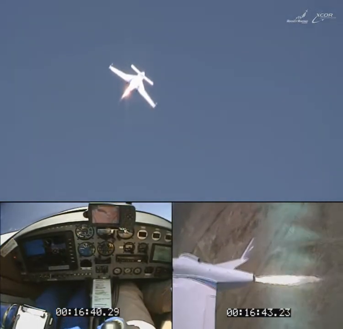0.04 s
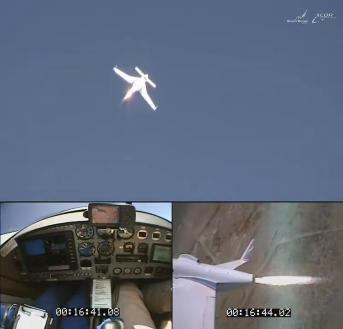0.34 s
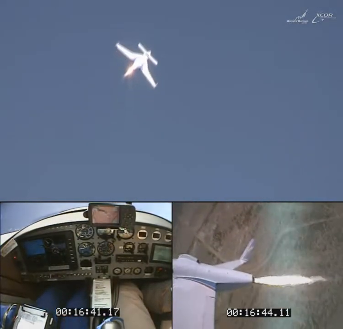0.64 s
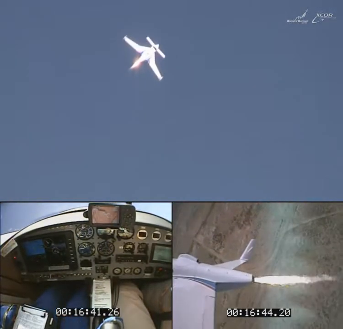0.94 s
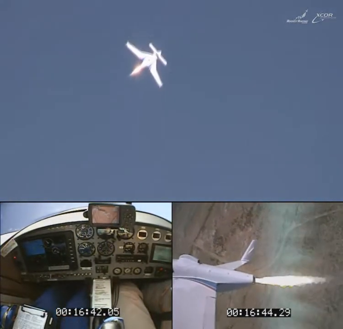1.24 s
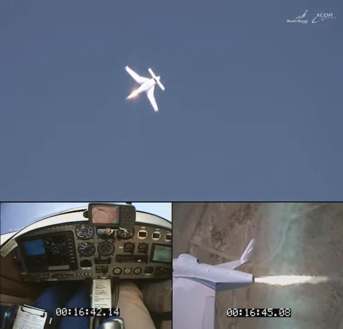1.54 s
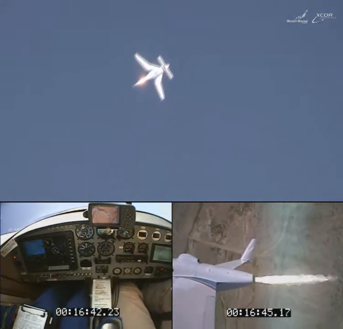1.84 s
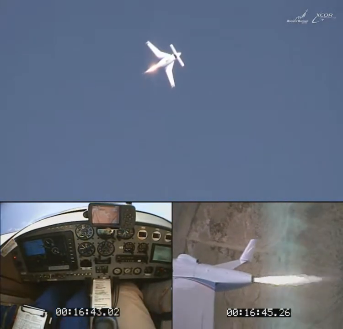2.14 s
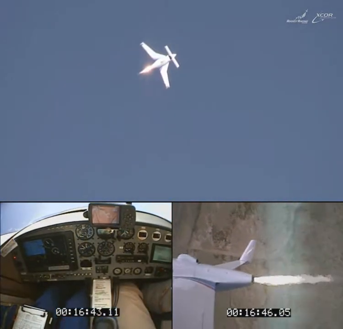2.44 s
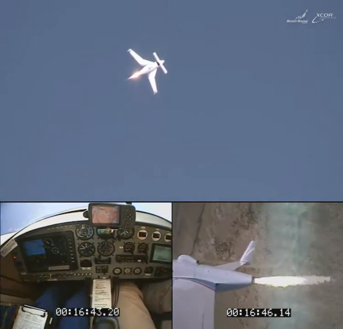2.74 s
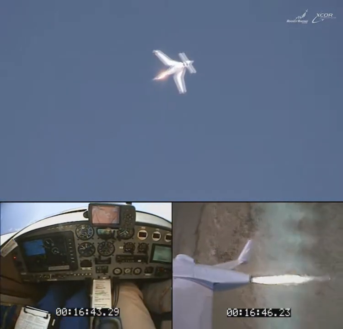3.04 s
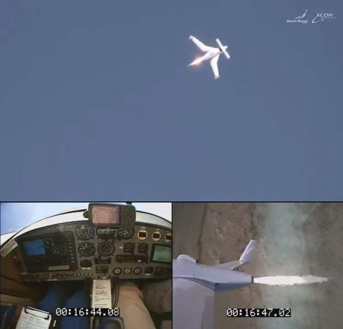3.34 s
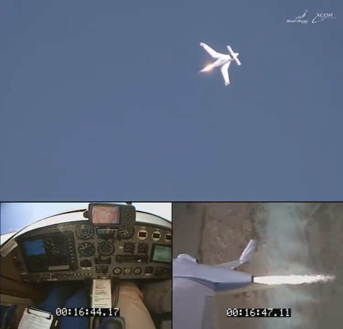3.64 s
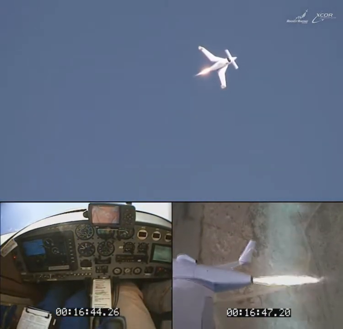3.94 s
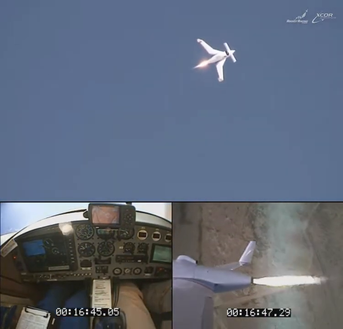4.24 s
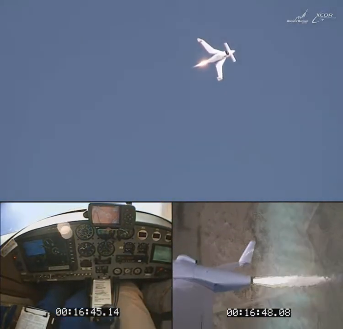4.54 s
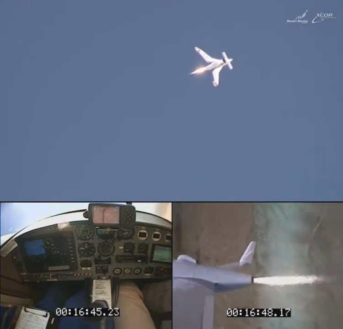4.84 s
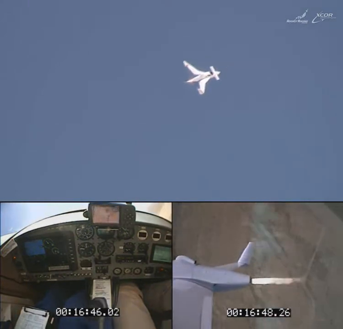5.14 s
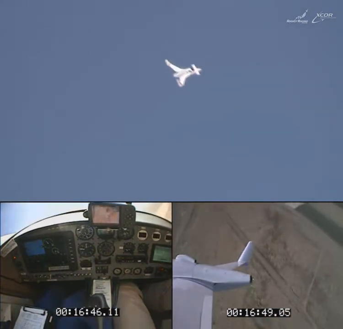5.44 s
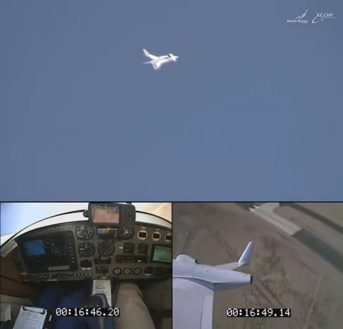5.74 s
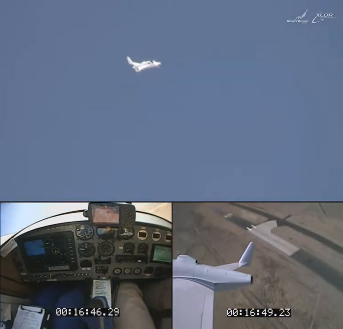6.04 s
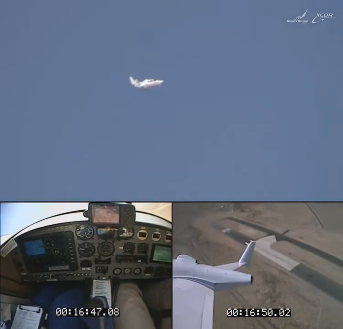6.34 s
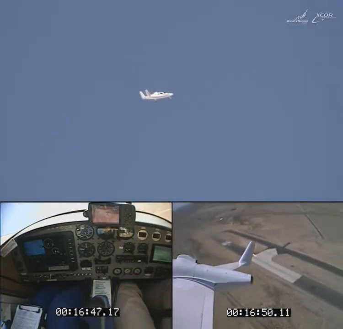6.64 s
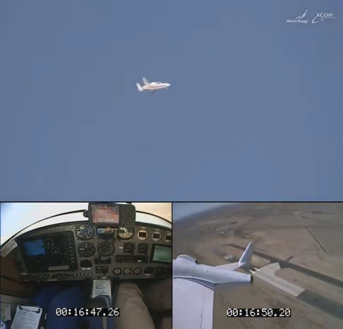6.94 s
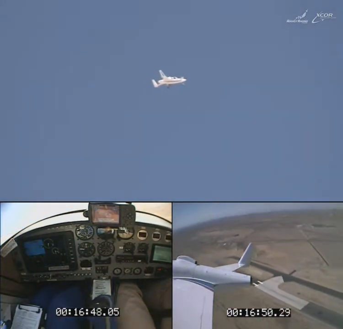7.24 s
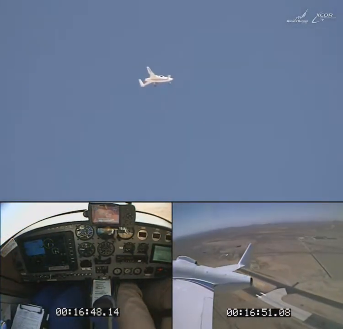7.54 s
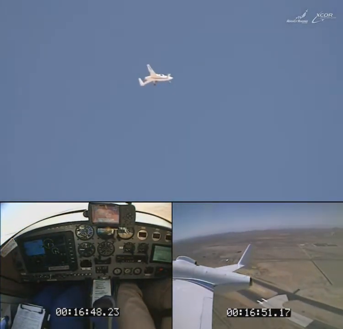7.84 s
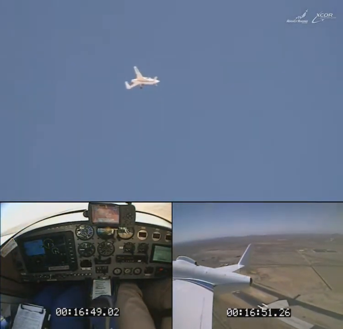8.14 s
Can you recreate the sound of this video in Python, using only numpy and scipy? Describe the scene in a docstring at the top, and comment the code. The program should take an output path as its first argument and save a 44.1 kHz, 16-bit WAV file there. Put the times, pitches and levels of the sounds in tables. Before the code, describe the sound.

Close inside a flying aircraft, a rocket flame rumbles and roars with a fluttering, low-to-mid howl and light rattles, blended with crackling exhaust picked up from far below in the open air. Past halfway the flame dies with two low thumps and a snap. The far roar lingers, swelling and swirling in the wind, before dropping away near the end and leaving a thin slipstream hiss.

```python
"""In a rocket plane's cockpit and on the ground below, heard at once: the engine burns and shuts down.
On board the flame rumbles, roars and coughs, an oscillating flow howls near 330 Hz and fittings tick;
after flame-out the slipstream is left. On the ground the roar and howl arrive late, steepened into
crackle and combed by the ground echo, so they go on for two and a half seconds after the flame is out."""
import sys
import numpy as np
from scipy import signal
from scipy.fft import rfft, irfft
from scipy.io import wavfile
from scipy.ndimage import uniform_filter1d

SR = 44100
rng = np.random.default_rng(int(sys.argv[2]) if len(sys.argv) > 2 else 0)


def inscribe(sig):
    """Save sig as 16-bit PCM at rate SR to the path in sys.argv[1].

    A 1-D sig is mono; a 2-D sig holds one channel per row.
    Samples are clipped to [-1, 1] before scaling.
    """
    pcm = np.round(np.clip(np.atleast_2d(sig).T, -1, 1) * 32767)
    wavfile.write(sys.argv[1], SR, pcm.astype(np.int16))


N = 370440
TIME = np.arange(N) / SR
FLAME_OUT_S, TRAVEL_S, PASS_S = 4.982, 2.455, 3.07  # shutdown, delay to the ground, fly-over
ROAR_SAG_DB_PER_S, ROAR_FADE_DB_PER_S = 0.97, 30
FLUTTER_DB = .6

# the howl sags, then swoops up as the flow collapses: t/s, f/Hz, level/dB before the burn envelope
HOWL = [(0, 333.1, -18), (2.5, 330.2, -19.5), (2.85, 324.4, -19), (3.07, 336.6, -21.5), (3.2, 322, -19),
        (3.33, 323.4, -16), (3.5, 318, -16.5), (3.72, 333.6, -21.5), (3.82, 325.5, -17), (3.91, 321.9, -25),
        (3.98, 326, -16.5), (4.25, 327.7, -18), (4.39, 326.6, -25.5), (4.49, 327.5, -11.5),
        (4.55, 334, -25), (4.61, 337.3, -20.5), (4.76, 331.8, -19.5), (4.9, 338.4, -21), (5.02, 329, -18.5),
        (5.048, 283, -12.5), (5.105, 251.4, -27), (5.135, 346.8, -19), (5.2, 367, -20), (5.28, 398, -35),
        (5.38, 449, -57)]
# coughs of the flame, the last two as it dies: t/s, level/dB, half length/s, f/Hz
COUGHS = [(0.105, -19, 0.03, 88), (4.08, -19, 0.025, 76), (5.02, -15.5, 0.036, 90),
          (5.15, -13.5, 0.014, 72)]
# tone colours of the engine on board: f/Hz, relative level/dB
RUMBLE_COLOUR = [(10, -22), (25, -6.5), (38, -6.5), (65, -2), (84, -3.5), (102, -6.5), (130, -8.5),
                 (180, -15), (250, -23.5), (400, -49), (900, -91.5)]
ROAR_COLOUR = [(120, -31.5), (240, -18), (310, 8), (355, -2.5), (385, 2.5), (480, -2.5), (580, 0), (635, 9),
               (690, -2), (820, -11.5), (1020, -9), (1300, -27.5), (2100, -18.5), (2900, -32), (6000, -75)]
SNAP_COLOUR = [(1200, -24), (2050, -9), (2350, 5), (2600, -4), (3000, -8), (6000, -42)]

# fader ride of the howl on the ground: t/s, gain/dB
FAR_HOWL = [(5.25, -28), (5.43, -20.5), (5.6, -26.5), (5.7, -23), (5.78, -31), (5.88, -22), (6.12, -21),
            (6.31, -28), (6.38, -21), (6.46, -28), (6.75, -25.5), (6.84, -33), (6.96, -19.5), (7.07, -24.5),
            (7.32, -24.5), (7.42, -31.5), (7.5, -26), (7.58, -26), (7.74, -38.5), (7.85, -60)]
# Doppler shift, a little flat until the plane turns: t/s, shift/Hz
DOPPLER = [(5.4, -13), (6.4, -6), (7, 3)]
# bursts of strong shocks on the ground: t/s, boost/dB
SHOCKS = [(4.28, 4), (5.632, 1.5), (6.11, 1.3), (6.499, 5.3), (6.685, 1.5), (6.718, 3), (6.755, 3.5),
          (7.08, 2), (7.503, 3), (7.53, 1.5), (7.582, 2.8)]
# restless air swells the distant roar's treble and its body: t/s, gain/dB
TREBLE_SWELLS = [(0, 2.5), (.15, 2.5), (.3, -9), (.55, 3), (.75, -3), (.95, 1), (1.2, -1), (1.45, -5.5),
                 (1.56, -2), (1.68, -3.5), (1.97, 1), (2.15, -8), (2.35, 2.5), (2.75, -1), (3.08, -4.5),
                 (3.24, 6.5), (3.5, -0.5), (4.15, -2), (4.28, 0), (4.45, -4), (4.76, 5.5), (4.92, -9.5),
                 (5.28, 0.5), (5.44, 4), (5.54, -8), (5.69, 4), (5.77, -16), (5.86, -0.5), (6.11, 1),
                 (6.24, -3.5), (6.49, 3), (6.53, 1), (6.69, 8.5), (6.8, -5), (6.9, -1), (7.05, -5.5),
                 (7.2, 1.5), (7.37, -5), (7.45, 2), (7.5, 12), (7.59, 6), (7.65, -4), (7.85, 9)]
BODY_SWELLS = [(5, 0.5), (5.25, -0.5), (5.5, 2), (5.62, 4), (5.72, 0), (5.78, -2), (6, -4.5), (6.13, 2),
               (6.35, -2), (6.65, 3), (6.8, 1.5), (6.91, 5), (6.99, -4.5), (7.15, 3.5), (7.32, 2),
               (7.4, -2), (7.52, 4.5), (7.62, 6.5)]
# whistling flares in the distant roar: t/s, f/Hz, boost/dB, half length/s, glide/(Hz/s)
FLARES = [(.11, 1650, 6, .04, 0), (.17, 1520, 14, .04, 0), (0.945, 1620, 16, .045, 0),
          (.99, 2200, 4, .05, 0), (1.93, 1230, 13, .035, 0), (1.97, 1730, 8, .09, 600),
          (2.36, 1530, 3, .07, 0), (2.38, 1944, 3, .1, -300), (2.65, 1010, 3, .2, -200),
          (2.78, 1480, 6.5, .12, -400), (3.27, 1880, 5, .05, 0), (3.38, 1340, 2, .1, 900),
          (3.67, 890, 6.5, .06, 700), (3.64, 1750, 6, .07, 0), (3.9, 1290, 7, .05, 0),
          (3.96, 1700, 6, .05, 0), (4.24, 1300, 4.5, .06, 900), (4.985, 1240, 14, .04, -1200),
          (5.62, 900, 3, .08, 0), (6.43, 2250, 6, .09, 5000), (6.66, 1180, 3.5, .07, 0),
          (6.97, 1600, 9, .04, 0), (7.26, 730, 2, .09, 0), (7.54, 1110, 9, .06, -800)]
# the ground echo lags more as the plane stands higher, and comes and goes in the wind: t/s, lag/s, gain/dB
ECHO = [(.6, .00182, -2), (1.6, .00187, 1), (2.0, .0018, 0), (2.3, .00202, 3), (2.85, .00209, 3),
        (3.2, .0022, -1), (3.7, .0023, 3), (4.35, .00235, 3), (4.75, .00242, -3), (6.1, .00253, -2),
        (6.8, .0027, 0), (7.2, .00289, 1.5)]
# EQ of the long air path and of the bounce off the ground: f/Hz, gain/dB
AIR_EQ = [(400, -2), (1200, 0), (2200, 2), (3000, -5.5), (4500, -32.5), (9000, -45.5)]
GROUND_EQ = [(200, -2.5), (900, -5), (1500, -9), (2500, -14)]
# tone colours of the exhaust from the ground: f/Hz, relative level/dB
BODY_COLOUR = [(60, -31.5), (170, -10.5), (280, 3), (430, 1), (560, -3.5), (710, 2.5), (860, -3),
               (1030, -3), (1350, -8), (1900, -23.5), (2800, -35), (6000, -86)]
CRACKLE_COLOUR = [(500, -35), (1100, -10.5), (1600, -1), (2200, -5), (2700, -19.5), (3400, -27),
                  (4500, -42.5), (8000, -63)]
CRACK_COLOUR = [(250, -10), (600, 12), (2300, -4), (3200, -14), (4200, -25.5), (8000, -54)]

# clear ticks in the cockpit: t/s, level/dB of the first snap, length/s
TICKS = [(0.139, -44, .002), (0.7512, -34.5, .007), (0.8674, -44, .002), (1.257, -47, .002),
         (1.9754, -43, .002), (2.1515, -47, .002), (2.2628, -46, .002), (2.3291, -47, .002),
         (2.4503, -45, .002), (2.612, -45, .003), (2.7337, -44, .004), (2.8459, -44, .018),
         (3.3124, -43.5, .015), (3.3847, -45, .006), (3.524, -47, .003), (3.752, -46, .003),
         (3.8262, -47, .008), (3.9659, -45.5, .012), (3.984, -47, .004), (4.1654, -47.5, .004),
         (4.6194, -49, .003), (4.7626, -47, .012), (4.801, -50, .003), (4.8489, -51, .003),
         (5.1432, -44, .014), (6.7186, -50, .004)]
# hiss of gas and air along the hull: t/s, level/dB in the 4-7 kHz band
HISS = [(0, -54.5), (2.15, -55.5), (2.6, -57.5), (3.25, -55), (5.1, -60.5), (5.8, -63), (8.35, -66)]
# tone colours of the ticks and the slipstream bed: f/Hz, relative level/dB
TICK_COLOUR = [(2000, -13.5), (4500, 0), (5800, -1), (7000, -5), (8600, -7.5), (11000, -11), (15000, -21)]
HISS_COLOUR = [(1500, -16), (2900, -5.5), (3350, 10.5), (3900, 0), (4500, 0), (5100, 1.5), (6200, -11.5),
               (7200, -16), (7850, -12.5), (8400, -24), (9600, -20), (10800, -15.5), (11800, -35),
               (15000, -47.5)]
BUFFET_COLOUR = [(15, -10.5), (35, -5), (80, -3.5), (130, -12.5), (300, -31.5), (900, -82.5)]
FIZZ_COLOUR = [(4000, -12.5), (7200, 4), (8600, -1.5), (10800, -3), (12000, -17), (15000, -24)]
CABIN_COLOUR = [(12, -6), (35, -4.5), (100, -20), (250, -10), (315, 1.5), (400, -14.5), (550, -4.5),
                (750, -13), (1100, -22.5), (1500, -18), (1750, -26.5), (2000, -16), (2600, -27),
                (3500, -58)]
WIDE_COLOUR = [(1000, -22), (3800, -10), (5200, -10.5), (6500, -18), (10500, -19.5), (12000, -44)]


def onboard_engine():
    """Rumble, roar and howl carried through the airframe, whose resonance adds a low boom."""
    hz, howl_db = curves(HOWL)
    rumble = burn(-19, sag_db_per_s=1.5, fade_db_per_s=14.5) * steadied(noise(RUMBLE_COLOUR), size=8000)
    flutter = amp(FLUTTER_DB * wander(5.5))
    roar = burn(-21, ROAR_SAG_DB_PER_S, ROAR_FADE_DB_PER_S) * flutter * noise(ROAR_COLOUR)
    flow = howl(hz, rough=1.5, flutter_hz=16)
    tone = burn(howl_db + throb(), sag_db_per_s=0.5, fade_db_per_s=58) * flow
    airframe = howl(np.full(N, 83), rough=5.3, flutter_hz=13)
    boom = burn(-25.5, sag_db_per_s=0, fade_db_per_s=48.5) * airframe
    return rumble + boom + roar + tone


def burn(level_db, sag_db_per_s, fade_db_per_s, delay_s=0):
    """The flame's envelope: a slow sag throughout, plus a quick fade once it is out."""
    out_for_s = np.maximum(TIME - delay_s - FLAME_OUT_S, 0)
    return amp(level_db - sag_db_per_s * TIME - fade_db_per_s * out_for_s)


def howl(hz, rough, flutter_hz):
    """An oscillation whose strength and phase are shaken by turbulence."""
    turbulence = wander(flutter_hz, order=8) + 1j * wander(flutter_hz, order=8)
    sway = steadied(1 + rough * turbulence)
    return np.sqrt(2) * (sway * np.exp(2j * np.pi * np.cumsum(hz) / SR)).real


def throb(rms_db=0.1):
    """A very faint, uneven tremolo for the howl, in dB."""
    rate_hz = 2.9 * (1 + 0.17 * wander(4.6))
    return -rms_db * np.sqrt(2) * np.sin(2 * np.pi * np.cumsum(rate_hz) / SR)


def coughs():
    """Each cough is a low thump with a puff of roar; the flame lets go of the nozzle with a snap."""
    puff = amp(-10) * noise(ROAR_COLOUR) + amp(-12) * noise(RUMBLE_COLOUR)
    thumps = np.zeros(N)
    for at, db, half_s, hz in COUGHS:
        thump = np.sqrt(2) * np.cos(2 * np.pi * hz * (TIME - at))
        thumps += amp(db) * bump(at, half_s) * (thump + puff)
    snap = amp(-37.5) * bump(5.145, half_s=.011) * noise(SNAP_COLOUR)
    return thumps + snap


def distant_engine():
    """The same howl and the exhaust roar, crackling after a long way through the air."""
    hz = delayed(curves(HOWL)[0], TRAVEL_S) + curves(DOPPLER)[0]
    treble_db = curves(TREBLE_SWELLS)[0] + FLUTTER_DB * wander(7.8)
    lag_s = curves(ECHO)[0] * (1 + .01 * wander(2.5))  # eddies make the comb swirl
    burst = amp(sum(db * bump(at, half_s=.0098) for at, db in SHOCKS))
    flow = howl(hz * (1 + .02 * wander(8)), rough=.4, flutter_hz=45) * burst
    return distant_howl(flow, treble_db, lag_s) + distant_roar(flow, burst, treble_db, lag_s)


def distant_howl(flow, treble_db, lag_s):
    """The howl as trembling shock fronts, steepest when the air lets the treble through."""
    fronts = steepened(flow, lead_s=.00016 * amp(.35 * treble_db))
    trembling = steadied(fronts * amp(2 * wander(24)), size=3000)
    return amp(curves(FAR_HOWL)[0]) * ground_echo(coloured(trembling, AIR_EQ), lag_s)


def distant_roar(flow, burst, treble_db, lag_s):
    """Exhaust noise puffs on each rising swing of the howl: body, crackle, and cracks in the bursts."""
    slope = np.clip(evened(np.gradient(flow)), -2, 2)
    puffs = amp(2 * slope + .8 * wander(50)) * rng.standard_normal(N)
    jet = steadied(twinkled(puffs, patchy_db=1.5), size=3000)
    body = unit_band(ground_echo(coloured(jet, BODY_COLOUR), lag_s), band_hz=(700, 1400))
    crackle = unit_band(ground_echo(coloured(jet, CRACKLE_COLOUR), lag_s), band_hz=(1500, 2800))
    cracks = amp(-46) * (burst - 1) * unit_band(coloured(jet, CRACK_COLOUR), band_hz=(2600, 4000))
    # the body builds as the plane passes; the crackle sinks 1 dB a second
    body_db = -25.5 - 1.39 * abs(TIME - PASS_S) + curves(BODY_SWELLS)[0]
    crackle_db = -36.5 - TIME + treble_db
    late_fade = burn(0, sag_db_per_s=0, fade_db_per_s=44, delay_s=TRAVEL_S)
    return cracks + late_fade * (amp(body_db) * body + amp(crackle_db) * crackle)


def steepened(x, lead_s):
    """Crests travel faster than troughs and pile up into shock fronts."""
    arrival = TIME - lead_s * x
    latest = np.maximum.accumulate(arrival)
    earliest = np.minimum.accumulate(arrival[::-1])[::-1]
    return np.interp(TIME, (latest + earliest) / 2, x)


def twinkled(x, patchy_db, flare_half_hz=110):
    """Eddies along the path focus and scatter patches of the spectrum; FLARES places the whistles."""
    hz, t, spectrum = signal.stft(x, SR, nperseg=1024)
    patches = rng.standard_normal(spectrum.shape)
    for _ in range(2):
        patches = uniform_filter1d(uniform_filter1d(patches, size=4, axis=0), size=7, axis=1)
    depth_db = patchy_db * np.sqrt(np.minimum(hz, 2000) / 1000)
    gain_db = depth_db[:, None] * evened(patches)
    for at, pitch, db, half_s, glide in FLARES:
        detune_hz = hz[:, None] - pitch - glide * (t - at)
        gain_db += db * np.exp(-((t - at) / half_s) ** 2 - (detune_hz / flare_half_hz) ** 2)
    return signal.istft(spectrum * amp(gain_db), nperseg=1024)[1][:N]


def ground_echo(x, lag_s):
    """The ground returns a later, duller copy: a comb that slides down as the lag grows."""
    return x + amp(curves(ECHO)[1]) * delayed(coloured(x, GROUND_EQ), lag_s)


def ticks(rattles_per_s=50, gap_s=.0035, run_fade_db=4, decay_s=.0007):
    """Fittings chatter in the shaking cockpit: quick runs of snaps over a rattle that follows the roar."""
    sizes = amp(4 * np.minimum(rng.exponential(1, N), 3))
    knocks = (rng.random(N) < rattles_per_s / SR) * sizes
    knocks *= burn(-59, ROAR_SAG_DB_PER_S, ROAR_FADE_DB_PER_S)
    for at, db, length_s in TICKS:
        gaps = rng.uniform(.5, 1.5, 12)
        after_s = gap_s * (np.cumsum(gaps) - gaps[0])
        after_s = after_s[after_s < length_s]
        knocks[np.round((at + after_s) * SR).astype(int)] += amp(db - run_fade_db * after_s / length_s)
    snap = np.exp(-np.arange(400) / SR / decay_s)
    return signal.oaconvolve(knocks, snap)[:N] * noise(TICK_COLOUR)


def slipstream():
    """Air buffets and rushes round the canopy, with a thin, slightly wide hiss that fizzes at first."""
    hiss_db = curves(HISS)[0]
    hiss = amp(hiss_db) * unit_band(noise(HISS_COLOUR), band_hz=(4000, 7000))
    buffet = amp(hiss_db + 25.5) * noise(BUFFET_COLOUR)
    fizz = amp(-63.5 - 3 * TIME) * noise(FIZZ_COLOUR)
    side = amp(-74.5) * noise(WIDE_COLOUR)
    cabin = amp(-42.5) * noise(CABIN_COLOUR)
    return cabin + buffet + hiss + fizz + np.array([side, -side])


def amp(db):
    """Decibels to gain."""
    return 10 ** (np.asarray(db) / 20)


def evened(x):
    """Scales to rms 1."""
    return x / np.sqrt(np.mean(abs(x) ** 2) + 1e-20)


def curves(rows):
    """A table's columns after t/s as automation curves, one value a sample."""
    t, *columns = np.transpose(rows)
    return [np.interp(TIME, t, column) for column in columns]


def bump(at, half_s):
    """A smooth rise and fall around one moment."""
    return np.exp(-((TIME - at) / half_s) ** 2)


def delayed(x, lag_s):
    """A delay line with a steady or moving lag."""
    return np.interp(TIME - lag_s, TIME, x)


def coloured(x, points):
    """An EQ curve drawn on a log-frequency axis."""
    hz, db = np.transpose(points)
    f = np.fft.rfftfreq(len(x), 1 / SR)
    return irfft(rfft(x) * amp(np.interp(np.log(f + 1), np.log(hz), db)), len(x))


def unit_band(x, band_hz):
    """Scales a sound so that one band of it has rms 1."""
    f = np.fft.rfftfreq(N, 1 / SR)
    in_band = (f > band_hz[0]) & (f < band_hz[1])
    return x / np.std(irfft(rfft(x) * in_band, N))


def noise(points):
    """Turbulent noise of a given colour, rms 1."""
    return evened(coloured(rng.standard_normal(N), points))


def wander(rate_hz, order=2):
    """Random modulation, rms 1; a higher order keeps it more strictly below the rate."""
    f = np.fft.rfftfreq(N, 1 / SR)
    return evened(irfft(rfft(rng.standard_normal(N)) / (1 + (f / rate_hz) ** order), N))


def steadied(x, size=6000):
    """A leveller over `size` samples: keeps quick flutter and irons out slow swings."""
    return x / np.sqrt(uniform_filter1d(abs(x) ** 2, size) + 1e-9)


def scene():
    """Cockpit and ground mixed near the centre over the slipstream bed, with a trace of width."""
    cockpit = onboard_engine() + coughs() + ticks()
    ground = distant_engine()
    pan = amp([[.13], [-.13]])  # a hair to the left
    side = amp(-32) * delayed(cockpit, .011)
    return pan * cockpit + ground + slipstream() + np.array([side, -side])


def record(dry):
    """Soft overload on the highest peaks, then a low-pass at 15450 Hz."""
    rounded = dry / (1 + (dry / .75) ** 8) ** (1 / 8)
    lowpass = signal.firwin(511, 15450, window=("kaiser", 9), fs=SR)
    return signal.oaconvolve(rounded, lowpass[None], "same")


dry = scene()
out = record(dry)
inscribe(out)
```